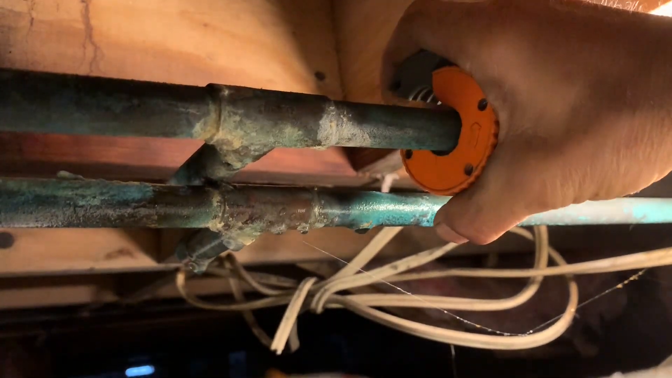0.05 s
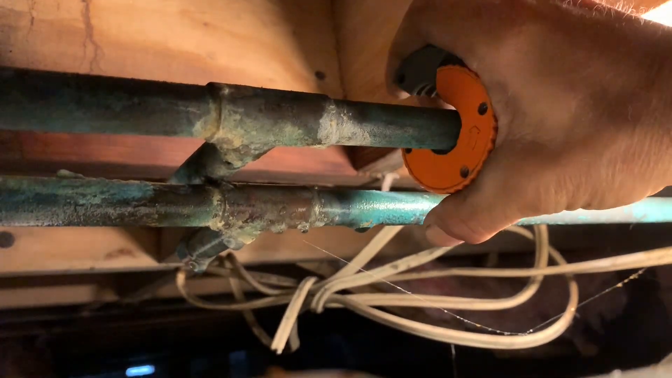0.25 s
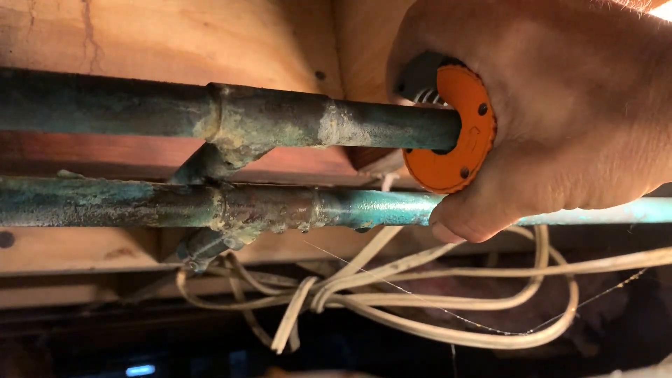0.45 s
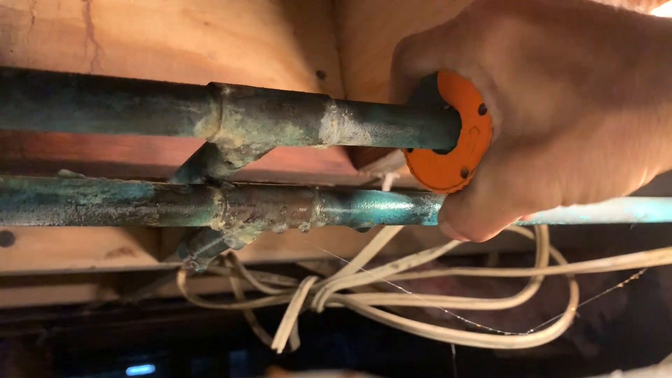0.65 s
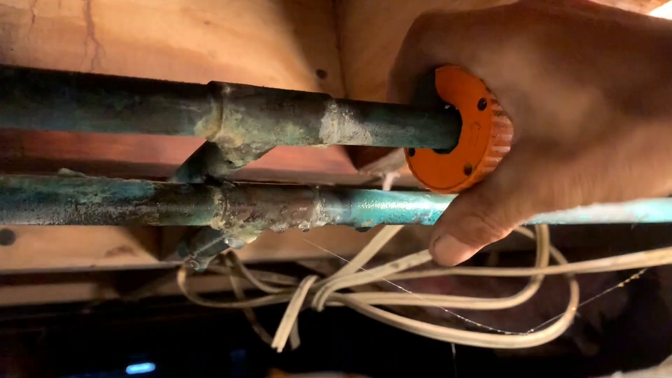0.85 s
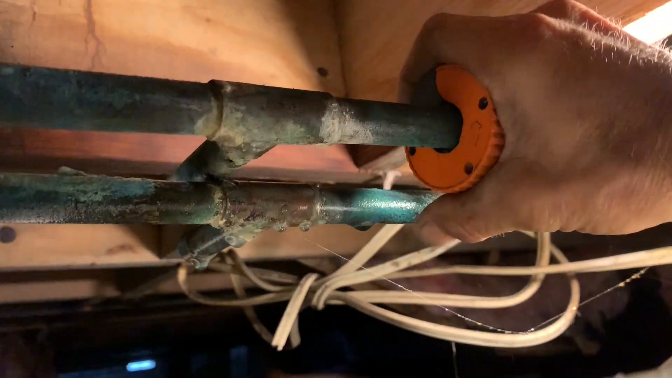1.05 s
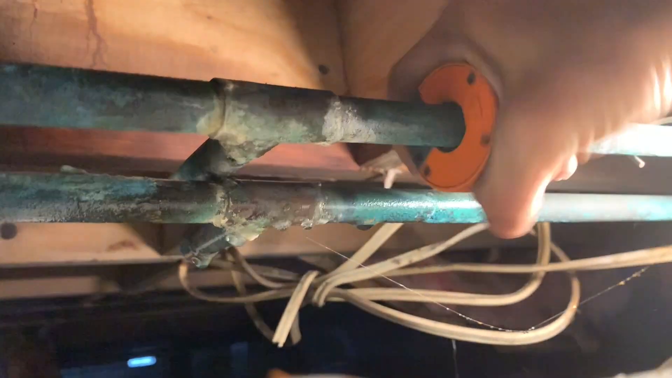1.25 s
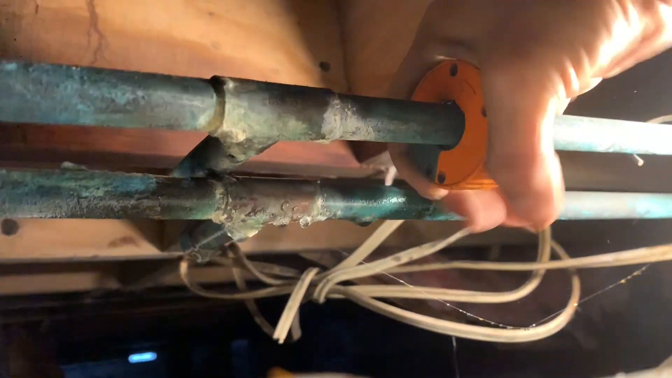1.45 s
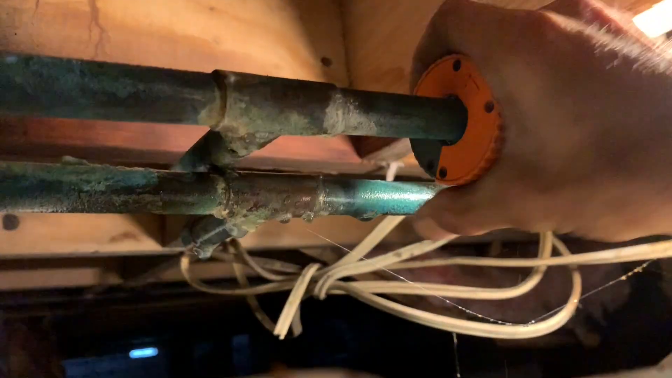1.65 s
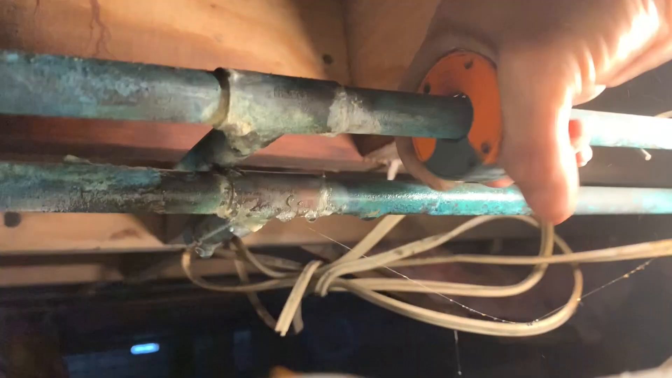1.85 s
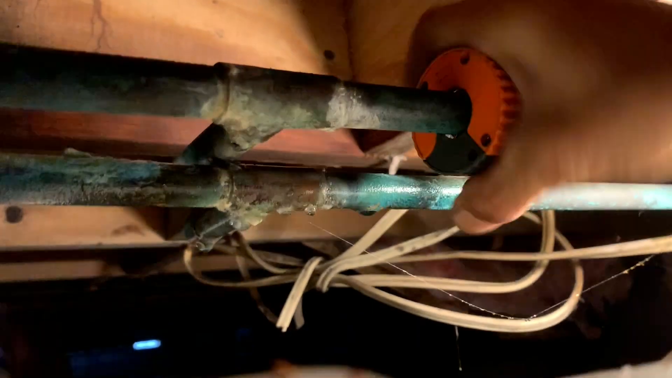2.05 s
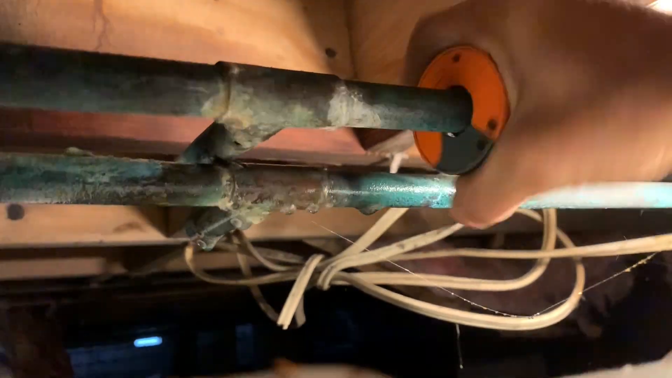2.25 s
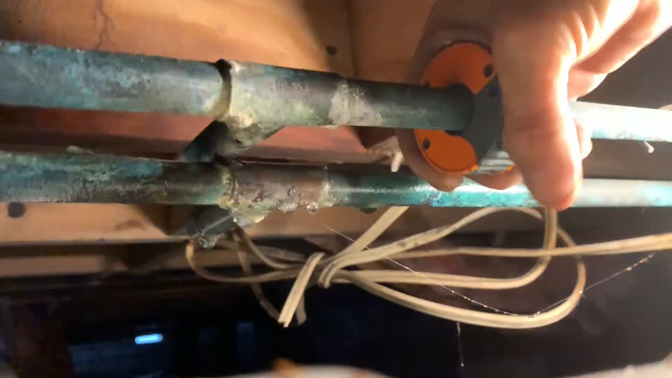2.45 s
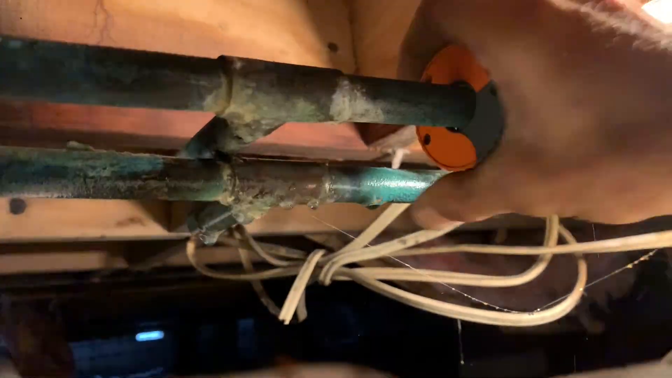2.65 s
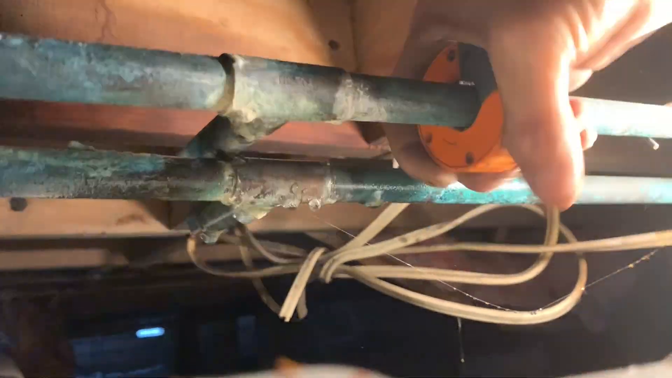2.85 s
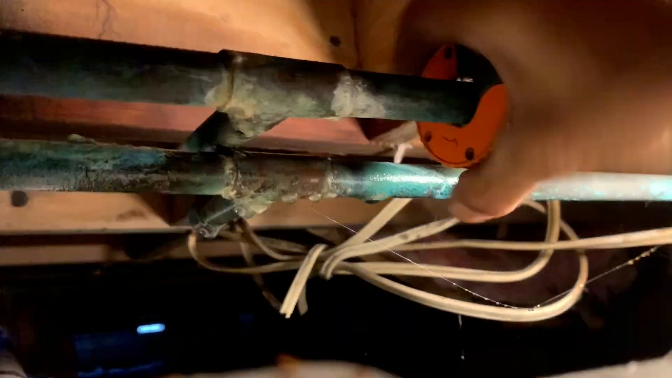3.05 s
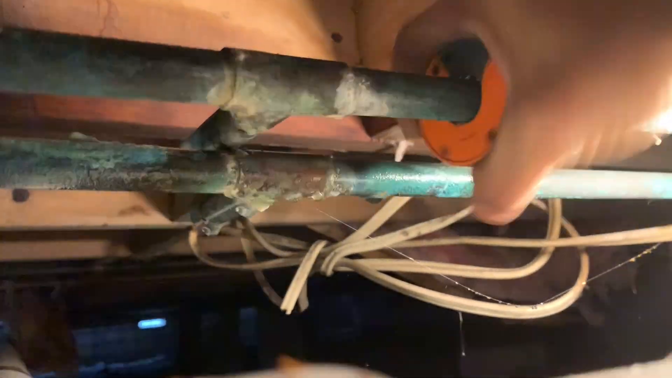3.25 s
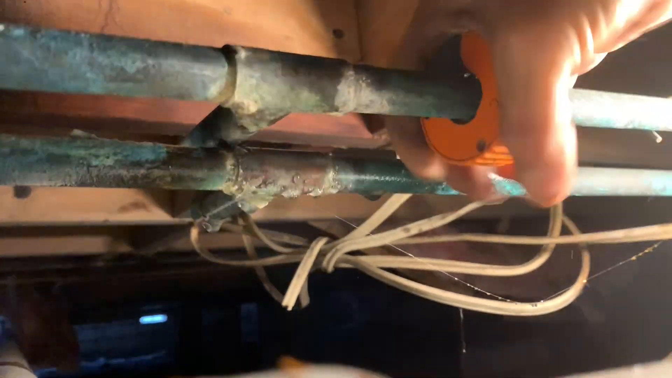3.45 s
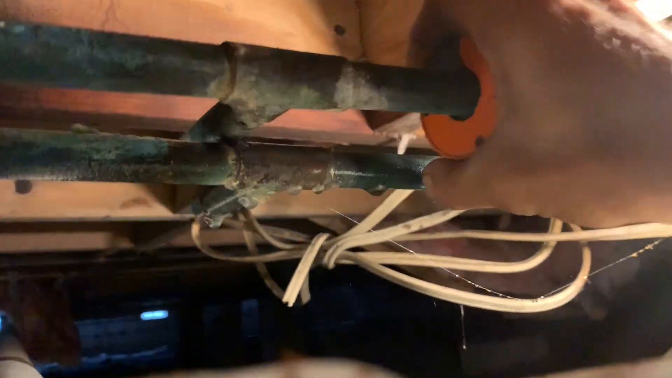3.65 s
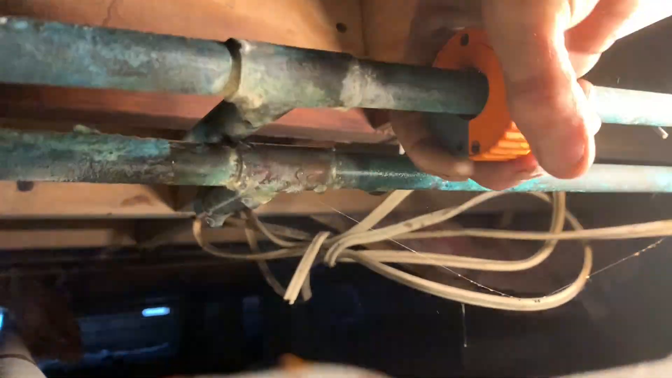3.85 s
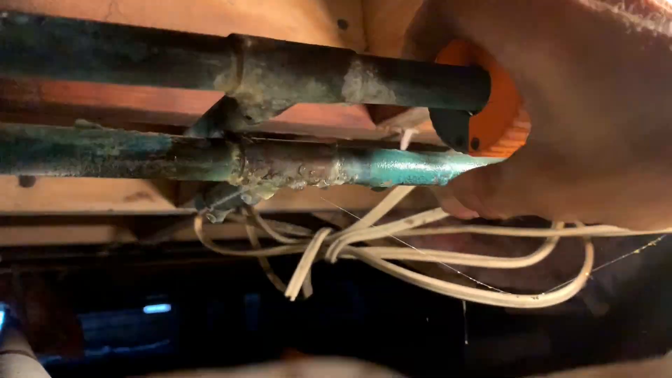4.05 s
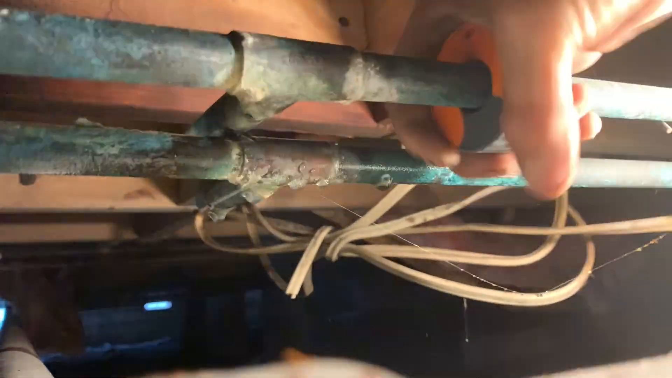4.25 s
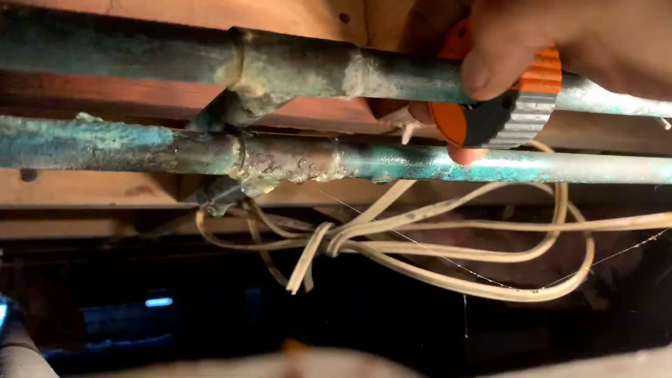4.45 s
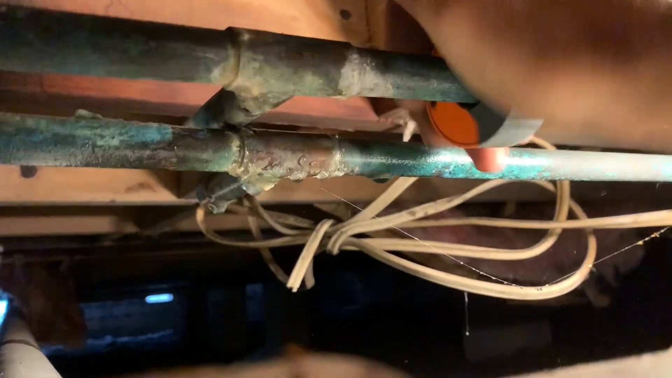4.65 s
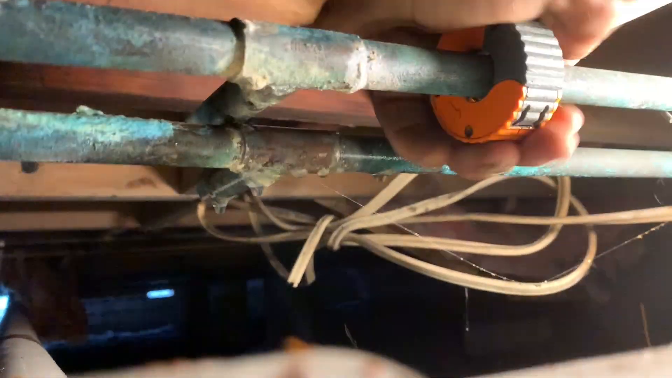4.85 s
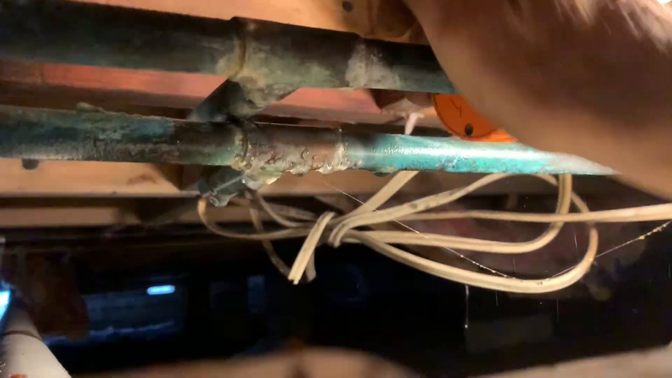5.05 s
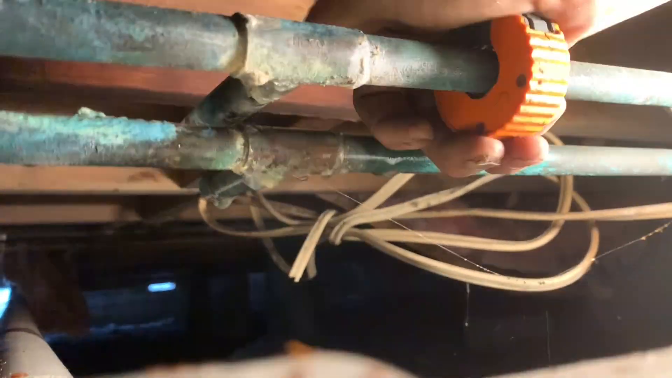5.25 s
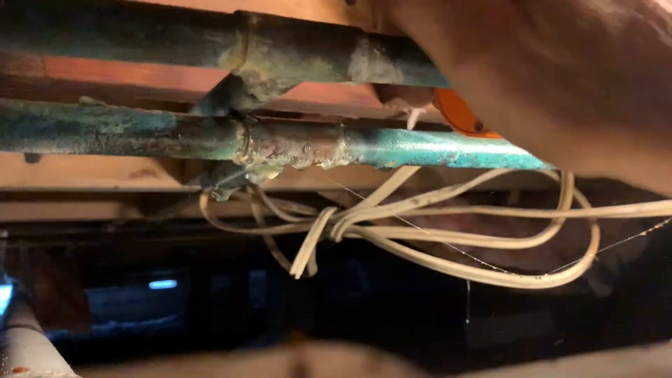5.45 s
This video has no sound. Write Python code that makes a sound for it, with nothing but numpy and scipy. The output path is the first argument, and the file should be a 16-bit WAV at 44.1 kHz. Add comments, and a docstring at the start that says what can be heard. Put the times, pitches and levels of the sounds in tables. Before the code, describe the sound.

Close stereo phone sound in a small wooden crawlspace with faint low rumble. For the first half second it is almost silent, with weak rubbing and tiny dry ticks, thickening into a quick run of clicks from 0.45 to 0.63. At 0.66 a loud, bright metallic snap strikes the pipe, rattling for an instant and ringing briefly with a dull thud. From 0.9 light scrapes begin; a longer rasp swells around 1.3. From 1.5 to 4.7 short gritty strokes come about four a second, stronger and weaker alternating, bright and sandy on top, with hollow pipe tone and low thrum beneath. Soft hand thumps, ticks and tiny clinks mark the regrips. At 4.9 a duller knock lands with a swelling scrape. Around 5.16 to 5.3 a thump and tight rattle of clicks and clinks follow, then a double knock at 5.35 and a strong final rasp until the end at about 5.5.

```python
"""Wheel cutter on a copper pipe

In a crawlspace a small wheel cutter is snapped onto a water pipe and twisted round it in short strokes.
Flickering noise makes the grinding wheel, the ringing pipe and the thrumming hangers; noise bursts and dying
modes make ticks, clinks, knocks and hand thumps. Boards and ground answer with dense short echoes.
A low rumble fills the space, and a phone with two microphone ports listens from close by."""
import sys
import numpy as np
from scipy import signal
from scipy.fft import rfft, irfft
from scipy.io import wavfile
from scipy.ndimage import uniform_filter1d

SR = 44100
rng = np.random.default_rng(int(sys.argv[2]) if len(sys.argv) > 2 else 0)


def generate_wav(sig):
    """Save sig (samples, or channels by samples) to the path in sys.argv[1] as 16-bit PCM at SR."""
    pcm = np.round(np.clip(np.atleast_2d(sig).T, -1, 1) * 32767).astype(np.int16)
    wavfile.write(sys.argv[1], SR, pcm)


N = 242991
HZ = np.maximum(np.fft.rfftfreq(N, 1 / SR), 1)

# Low noise of the house. Each row: frequency in Hz, relative density in dB per Hz.
RUMBLE = [(15, -49.5), (25, 4.5), (64, 10.5), (134, -0.5), (157, -8), (190, -12), (560, -20), (624, -34),
          (2990, -51), (6560, -48), (7110, -42.5), (7710, -78), (16000, -62.5)]
RUMBLE_DB = -54  # before the balance between the ports
# Echo of boards and ground over the direct sound. Each row: frequency in Hz, relative level in dB.
ECHO = [(60, 2.5), (300, -16), (800, 1), (1500, 5.5), (7000, 5.5), (9000, 4), (10500, -9.5), (13000, -8),
        (16000, 9)]
# Left port minus right, direct sound. Each row: frequency in Hz, difference in dB.
LEFT_DB = [(60, 4.5), (300, -0.8), (1300, 1), (2000, -4.5), (3500, 2), (5400, 6), (7300, 1.5), (8700, 13),
           (10500, -1.2), (16000, 1.8)]
LAG_S, LAG_TOP_HZ = 0.0003375, 8440  # delay at the left port, and where it gives out
TOP_HZ = 15750  # upper limit of the phone

# Soft thumps of the hand taking hold.
# Each row: start in seconds, level in dB, length factor, frequency in Hz above which it is dull.
THUMPS = [(1.506, -39.5, 0.47, 800), (1.721, -43.5, 0.49, 500), (2.839, -43, 0.73, 400),
          (3.213, -36.5, 0.34, 350), (3.305, -43, .3, 250), (3.509, -43.5, 0.49, 700),
          (3.774, -52, 0.32, 350), (4.228, -46, .4, 350), (5.159, -46, 0.33, 900)]
# The cutter snapping on, then knocking against the pipe.
# Each row: start in seconds, crack level in dB, dullness in dB per octave, ring level in dB,
# thud over ring in dB, length factor, chatter in seconds, chatter level in dB,
# middle modes over ring in dB, build-up of the modes in cycles.
KNOCKS = [(0.6621, -16, 1.53, -28, 1, 0.6, 0.0035, 11.5, 1, 2.7),
          (4.89, -33, 2, -33.5, -4.5, 0.9, 0.0039, 0, 2.5, 5.2),
          (5.3530, -28.5, 1.5, -31.5, -5.5, 0.93, 0.0022, 8.5, 0.5, 3.6),
          (5.3585, -34.5, 3, -43, -19, 0.59, 0.0028, 5, 10, 1.5)]
# Modes of cutter and pipe. Each row: frequency in Hz, relative level in dB, 60 dB decay in seconds.
BODY = [(117.4, -4, 0.31), (151.7, 2, 0.26), (246.2, -4.5, 0.23), (362.5, -8.5, 0.22), (548, -0.5, 0.16),
        (686, -1.5, 0.12), (794, -12.5, 0.1), (1162, -14, 0.16), (1775, -7.5, 0.14), (1946, -14.5, 0.24),
        (2070, -12, 0.16), (2185, -10, 0.16), (2343, -11, 0.097), (2845, -16, 0.15), (3290, -13.5, 0.11),
        (3890, -7, 0.044), (8500, -10, 0.057), (8750, -2, 0.072), (10560, -11, .08)]
# Spectrum of a crack. Each row: frequency in Hz, relative density in dB per Hz.
CRACK = [(47, -31), (80, -1.5), (651, 3), (862, -15), (1390, -7), (1840, -9), (2710, -9.5), (3910, -4),
         (4750, -18), (5300, -22), (6400, -14), (8890, -6), (14000, -40.5)]
# Decay of a crack before its length factor. Each row: frequency in Hz, 60 dB decay in seconds.
CRACK_T60 = [(100, 0.61), (300, 0.21), (1000, 0.17), (3000, 0.14), (8000, 0.079), (16000, 0.14)]
# Small ticks of wheel and spring.
# Each row: start in seconds, relative level in dB, relative dullness in dB per octave.
TICKS = [(0.1395, -40.5, -28), (0.371, -44.5, 3.5), (0.4488, -36.5, -23), (0.4885, -53, -8),
         (0.507, -43, -13), (0.5193, -45.5, -16), (0.545, -45, -12), (0.5603, -37, -1.5),
         (0.574, -58, -7.5), (0.6, -40, -8), (0.612, -51, -9), (0.625, -33, -10), (0.75, -43, 2),
         (0.86, -40, -3), (1.204, -53, -1), (1.279, -39, 1.5), (1.3635, -39, 2.5), (1.5068, -42.5, 11),
         (1.715, -38, 3.5), (2.673, -42, -23), (2.7506, -51, -8), (2.86, -37, -2), (3.218, -42, 8.5),
         (3.6512, -40.5, -2.5), (5.1621, -34, 12), (5.2065, -41, -2), (5.2167, -36, -3), (5.2254, -36, -6),
         (5.232, -33, -2), (5.2775, -50, -14), (5.2824, -50, 5), (5.298, -51, 14)]
# Brief pitched clinks of the rollers.
# Each row: start in seconds, relative level in dB, pitch in Hz, 60 dB decay in seconds.
CLINKS = [(0.0837, -63.5, 2030, 0.13), (0.8175, -58, 2070, 0.092), (0.945, -63, 3350, 0.056),
          (1.279, -55, 1735, 0.054), (1.3648, -57, 3190, 0.046), (1.6945, -51, 1790, .04),
          (1.716, -54, 3500, 0.021), (1.7539, -56, 1713, 0.045), (1.897, -46, 1745, 0.022),
          (2.705, -54, 1960, 0.043), (2.9746, -61.5, 1980, 0.074), (3.2136, -55, 1700, .04),
          (3.3444, -60, 3370, 0.12), (3.3997, -53, 2120, 0.019), (4.4148, -54, 1810, 0.046),
          (5.205, -38, 2090, 0.017), (5.2163, -31, 2050, 0.013), (5.2070, -45, 3130, .015),
          (5.2190, -41.5, 3300, 0.016), (5.2265, -44, 3750, .015), (5.2321, -43, 1700, 0.036),
          (5.2824, -43, 1800, 0.016)]

# Twists of the hand and the small shifts of grip between them.
# Each row: full force at seconds, hold in seconds, grinding in dB, sag of the grinding over the hold in dB,
# ring in dB, thrum in dB.
STROKES = [ (0.01, 0.031, -80, -10, -118, -67.5), (0.385, 0.027, -90, -1, -71, -67),
           (0.472, .06, -69, 9, -72, -72), (0.573, 0.029, -61.5, 4, -81, -79),
           (0.641, 0.02, -53.5, -19, -63.5, -70.5), (0.882, 0.011, -55.5, 6.5, -78, -58),
           (0.968, 0.11, -64, 4.5, -66.5, -61), (1.226, 0.022, -63.5, -1, -75.5, -71),
           (1.296, 0.14, -54.5, 12.5, -63.5, -56), (1.468, 0.032, -66, 14, -73, -57),
           (1.539, 0.048, -54, -4, -64, -47.5), (1.692, 0.024, -59, 26, -79, -60),
           (1.745, 0.012, -77, -8, -66, -53.5), (1.814, 0.084, -57.5, -1, -63.5, -49),
           (2.036, 0.069, -53, 0.5, -63.5, -50.5), (2.207, 0.024, -68, 9, -64, -54.5),
           (2.315, 0.082, -52.5, 0.5, -61, -51), (2.546, 0.067, -52.5, 0, -65, -53),
           (2.709, 0.023, -62.5, 10, -72, -58), (2.817, 0.07, -52, 3, -58, -47),
           (3.049, 0.064, -51, 1.5, -60.5, -48), (3.186, 0.053, -62.5, 10, -67, -50),
           (3.286, 0.059, -53, -1, -59, -47), (3.396, 0.0099, -58.5, 8, -65.5, -57),
           (3.504, 0.09, -52.5, -3, -64, -48.5), (3.668, 0.032, -59, 8, -72, -51.5),
           (3.755, 0.086, -56.5, -2.5, -60, -47), (3.908, 0.056, -71, -12, -60, -62),
           (3.985, 0.083, -55, 2.5, -82, -55), (4.152, 0.016, -67, 10, -81, -51),
           (4.229, 0.091, -54.5, 7.5, -58, -47), (4.426, 0.038, -51, 9, -60, -55),
           (4.491, 0.033, -56.5, 4.5, -77, -67), (4.603, .02, -61, 13, -78, -67),
           (4.697, 0.099, -53.5, 1, -58, -46.5), (4.927, 0.11, -49, 11, -56, -44.5),
           (5.125, 0.15, -59.5, -5.5, -62, -48.5), (5.395, 0.025, -45.5, 4, -80, -44),
           (5.483, 0.016, -56, 8, -71, -58)]
# The hand resting on the tool between twists.
# Each row: time in seconds, grinding in dB, ring in dB, thrum in dB.
REST = [(0, -75.5, -84.5, -90), (0.35, -81, -75, -79), (0.8, -79.5, -78.5, -60),
        (1.15, -82.5, -81.5, -76.5), (1.4, -64.5, -71.5, -69), (2.2, -71.5, -67.5, -64),
        (3.45, -74.5, -82.5, -69), (3.9, -83, -63, -55.5), (4.6, -73, -71.5, -66), (5.32, -74, -65, -51),
        (5.51, -69, -62, -47)]
# Grinding wheel. Each row: frequency in Hz, relative density in dB per Hz.
GRIND = [(2060, -46.5), (3500, -12), (5030, -21.5), (6090, -7), (7040, -8.5), (8470, -5.5), (10400, -3),
         (13600, -7.5), (15100, -11), (16000, -23)]
# Ringing pipe. Each row: frequency in Hz, relative density in dB per Hz.
RING = [(410, -9), (700, -7.5), (1020, -7), (1570, -10), (1740, -6.5), (2630, -15), (3290, -16.5),
        (5000, -11), (6500, -37.5), (11000, -120)]
# Thrumming hangers. Each row: frequency in Hz, relative density in dB per Hz.
THRUM = [(29, -37), (50, 2), (178, -1), (240, -6.5), (275, -1), (315, -10.5), (403, -15.5), (551, -14.5),
         (606, -20), (1300, -49), (1690, -50.5), (2860, -120)]
# Resonances of the pipe under the wheel. Each row: frequency in Hz, width in Hz, relative level in dB.
PIPE = [(646, 280, 2), (1750, 47, -14.5), (2900, 15, -12), (3097, 43, -21), (6330, 52, -14),
        (7350, 93, -14), (8400, 860, 1.5)]
RISE_S, FALL_S = 0.075, 0.058  # how fast the grinding comes and goes
RING_RISE_S, RING_FALL_S = 0.12, 0.094
THRUM_RISE_S, THRUM_FALL_S, THRUM_LAG_S = 0.073, 0.1, 0.019  # the hangers follow late and settle slowly
CURVE = 1.87  # force follows the speed of the wheel raised to this power


def undb(db):
    """Amplitude factor of a level in dB."""
    return 10 ** (np.asarray(db) / 20)


def level(x, db):
    """x brought to an RMS level in dB."""
    return x * undb(db) / np.sqrt(np.mean(x ** 2))


def along(table, hz):
    """A table of frequency and value read on a log-frequency axis."""
    table = np.array(table)
    return np.interp(np.log(hz), np.log(table[:, 0]), table[:, 1])


def colour(x, gain):
    """x filtered by a gain for every frequency in HZ."""
    return irfft(rfft(x) * gain, N)


def walk(rate):
    """Random levels held 1 / rate s and slewed twice; spread near 1."""
    k = int(SR / rate)
    steps = np.repeat(rng.standard_normal(N // k + 1), k)
    return 1.31 * uniform_filter1d(uniform_filter1d(steps, k), k)[:N]


def patchy(x, table, lift, flicker_db, rate):
    """Half-octave bands of x, each flickering in level on its own."""
    out, gain = 0, undb(along(table, HZ)) * lift
    low, high = table[0][0], table[-1][0]
    for hz in low * 2 ** np.arange(0, np.log2(high / low) + .5, .5):
        share = np.clip(1 - 2 * np.abs(np.log2(HZ / hz)), 0, 1)  # neighbouring bands overlap
        out = out + colour(x, gain * share) * undb(flicker_db * walk(rate))
    return level(out, 0)


def ring(s, hz, db, t60, late):
    """One mode: a decaying sine that builds up over a few cycles."""
    out, k = np.zeros(N), int(s * SR) + 1
    age = np.arange(k, min(N, k + int(2 * t60 * SR))) / SR - s
    decay = np.exp(-np.log(1000) * age / t60)
    build_up = 1 - np.exp(-age * hz / late)
    out[k:k + len(age)] = undb(db) * decay * np.sin(2 * np.pi * hz * age) * build_up
    return out


def crack(at_s, db, dull_db, length, late, chatter_s, chatter_db):
    """A noise burst whose bands die at their own pace; the lows build up over a few cycles."""
    t, out = np.arange(SR // 3) / SR, np.zeros(N + SR)
    burst = 0
    # the parts rattle against each other for an instant, in the treble above all
    chatter = undb(chatter_db) / (1 + (t / chatter_s) ** 6)
    for hz in 100 * 2 ** np.arange(0, 7.2, .5):
        sos = signal.butter(1, [hz / 1.19, hz * 1.19], "bandpass", fs=SR, output="sos")
        t60 = along(CRACK_T60, hz)
        shape = np.exp(-np.log(1000) * t / (length * t60)) * (1 - np.exp(-t * hz / late))
        shape *= 1 + chatter / (1 + (2500 / hz) ** 4)
        gain = undb(along(CRACK, hz) - dull_db * np.log2(hz / 6000)) / np.sqrt(t60)
        burst = burst + gain * shape * signal.sosfilt(sos, rng.standard_normal(len(t)))
    k = int(at_s * SR)
    onset_rms = np.sqrt(np.mean(burst[:SR // 200] ** 2))  # the first 5 ms set the level
    out[k:k + len(t)] = burst * undb(db) / onset_rms
    return out[:N]


def rumble(side=0.23):
    """Low wavering noise of the house over a faint hiss, partly shared by the two ports."""
    mid, other = (patchy(rng.standard_normal(N), RUMBLE, 1, 0.63, 6.3) for _ in range(2))
    both = mid + side * other * np.array([[1], [-1]])
    return level(both, RUMBLE_DB) * undb(np.array([[.8], [-.8]]))  # a little stronger on the left


def joists(x, t60_s=0.04, hold_s=.05):
    """Dense short echoes from boards and ground, unlike at the two ports."""
    t, hop = np.arange(SR // 10) / SR, int(hold_s * SR)
    x = np.pad(colour(x, undb(along(ECHO, HZ))), (hop, 2 * hop))
    out = np.zeros((2, N + 4 * hop + len(t)))
    fade = np.sin(np.pi * np.arange(2 * hop) / (2 * hop))
    # a fresh noise tail fades in every hold_s seconds, so no single colouring stays
    for k in range(0, N + hop, hop):
        # each tail starts after 0.8 ms
        tail = rng.standard_normal((2, len(t))) * np.exp(-np.log(1000) * t / t60_s) * (t > .0008)
        tail /= np.sqrt(np.sum(tail ** 2, axis=1, keepdims=True))
        echo = signal.fftconvolve((fade * x[k:k + 2 * hop])[None], tail)
        out[:, k:k + echo.shape[1]] += echo
    return out[:, hop:hop + N]


def ports(x):
    """Direct sound reaches the left port later; the top arrives alike in time at both."""
    top = 1 / (1 + (LAG_TOP_HZ / HZ) ** 16)
    tilt = undb(along(LEFT_DB, HZ) / 2)
    delay = np.exp(-2j * np.pi * HZ * LAG_S)
    left = colour(x, tilt * (top + (1 - top) * delay))
    right = colour(x, 1 / tilt)
    return np.array([left, right])


def thumps():
    """A soft push reaches only the low modes, and the hand damps them quickly."""
    return sum(ring(s, f, db + g, length * t60, 1.6) / (1 + (f / top_hz) ** 4)
               for s, db, length, top_hz in THUMPS for f, g, t60 in BODY if f < 1500)


def knocks():
    """A crack, then the modes of cutter and pipe, struck a little differently each time."""
    out = 0
    # loose hangers and the gripping hand make every mode waver as it dies
    waver = [undb(min(f / 500, 2.5) * walk(min(f / 6, 400))) for f, _, _ in BODY]
    for s, db, dull, ring_db, thud_db, length, chatter_s, chatter_db, mid_db, late in KNOCKS:
        # spread of each mode: level in dB, pitch as a fraction
        chance = rng.standard_normal((len(BODY), 2)) * (1.2, .008)
        modes = 0
        for (f, g, t60), (off_db, bend), w in zip(BODY, chance, waver):
            thud = thud_db / (1 + (f / 450) ** 4)  # acts on the low modes
            mode_db = g + off_db + thud + mid_db * (1500 < f < 4500)
            modes = modes + w * ring(s, f * (1 + bend), mode_db, t60, late)
        snap = crack(s, db, dull, length, 1.25 * late, chatter_s, chatter_db)
        out = out + snap + undb(ring_db) * modes
    return out


def ticks():
    """Short dry clicks: cracks cut short, with under a millisecond of chatter."""
    return sum(crack(s, db - 13.0, dull - 3, 0.31, 2.5, 0.00076, 2.2) for s, db, dull in TICKS)


def clinks():
    """A pair of close modes that beat and blur; the stronger one dies four times sooner."""
    out = 0
    for (s, db, hz, t60), a in zip(CLINKS, rng.standard_normal(len(CLINKS))):
        out = out + ring(s, hz, db - 1.5, t60, 1.1)
        out = out + ring(s, hz * (1.0 + 0.098 * a), db + 6.0, 0.25 * t60, 1.0)
    return out


def grit(per_s, spread_db, smooth):
    """Grains of very unequal size breaking under the wheel, over a smooth rub."""
    hits = rng.random(N) < per_s / SR
    grains = hits * rng.standard_normal(N) * undb(spread_db * rng.exponential(size=N))
    return level(grains, 0) + smooth * rng.standard_normal(N)


def effort(db, sag_db, rest_db, rise_s, fall_s, lag_s):
    """Gain of one layer: every twist rises, holds while it sags or swells, and falls to the resting hand."""
    t = np.linspace(0, N / SR, num=N // 32)
    power = undb(np.interp(t, np.array(REST)[:, 0], rest_db)) ** 2
    for (s, hold, *_), top, sag in zip(STROKES, db, sag_db):
        age = t - s - lag_s
        speed = np.clip(np.minimum(1 + age / rise_s, 1 - (age - hold) / fall_s), 0, 1)
        peak = undb(top - sag * np.clip(age / hold, 0, 1))
        power = power + (peak * speed ** CURVE) ** 2
    return np.interp(np.arange(N) / SR, t, np.sqrt(power))


def strokes():
    """One contact force feeds the bright grinding and the pipe ring; the grip shakes the hangers."""
    grind_db, sag_db, ring_db, thrum_db = np.array(STROKES).T[2:]
    rest_grind, rest_ring, rest_thrum = np.array(REST).T[1:]
    lift = np.sqrt(1 + sum(undb(db + 1.5) ** 2 / (1 + (2 * (HZ - f) / w) ** 2) for f, w, db in PIPE))
    force = grit(3500, 2.0, 0.6) * undb(0.7 * walk(60) + 1.3 * walk(400))
    judder = grit(400, 1.5, 1.2)
    # the bands flicker as the contact wanders over the crust
    grinding = patchy(force, GRIND, lift, 2.2, 14)
    ringing = patchy(force, RING, lift, 2.1, 35)
    thrumming = patchy(judder, THRUM, lift, 2.1, 14)
    # the ring sags half as far as the grinding, the thrum not at all
    return (effort(grind_db, sag_db, rest_grind, RISE_S, FALL_S, 0) * grinding
            + effort(ring_db, 0.5 * sag_db, rest_ring, RING_RISE_S, RING_FALL_S, 0) * ringing
            + effort(thrum_db, 0 * sag_db, rest_thrum, THRUM_RISE_S, THRUM_FALL_S, THRUM_LAG_S) * thrumming)


def scene():
    """The rubbing and the blows, direct at the ports and echoed by the crawlspace, over the rumble."""
    blows = knocks() + thumps()
    rub = strokes() + ticks() + clinks()
    # the blows are loud and close by: their direct sound stands further above the echoes
    echoes = joists(undb(-1.0) * rub + undb(-3.0) * blows)
    return rumble() + echoes + ports(rub + blows)


def record(dry):
    """The phone drops the deepest bass and cuts the top steeply."""
    dry = signal.sosfilt(signal.butter(2, 35, "highpass", fs=SR, output="sos"), dry)
    return signal.sosfilt(signal.ellip(10, .2, 80, TOP_HZ, fs=SR, output="sos"), dry)


dry = scene()
out = record(dry)
generate_wav(out)
```